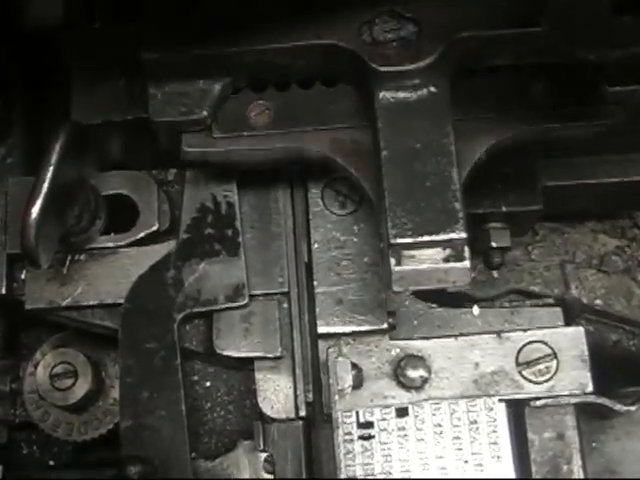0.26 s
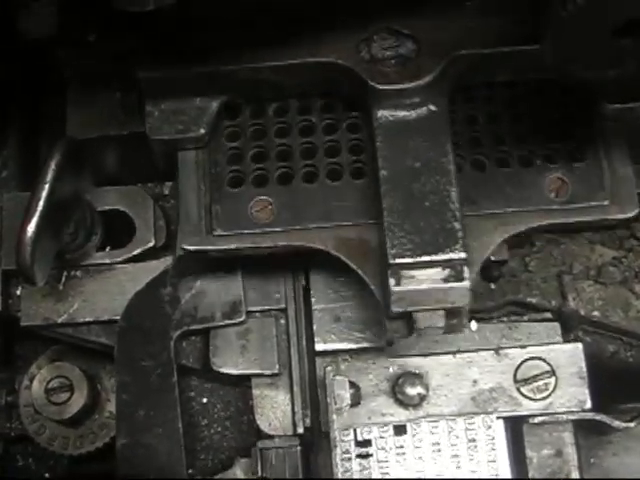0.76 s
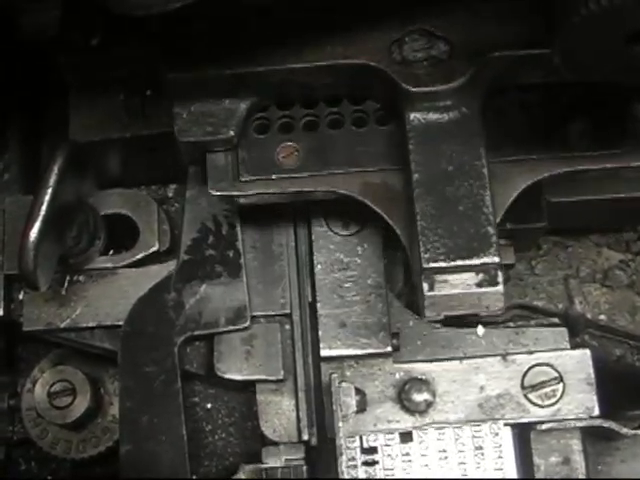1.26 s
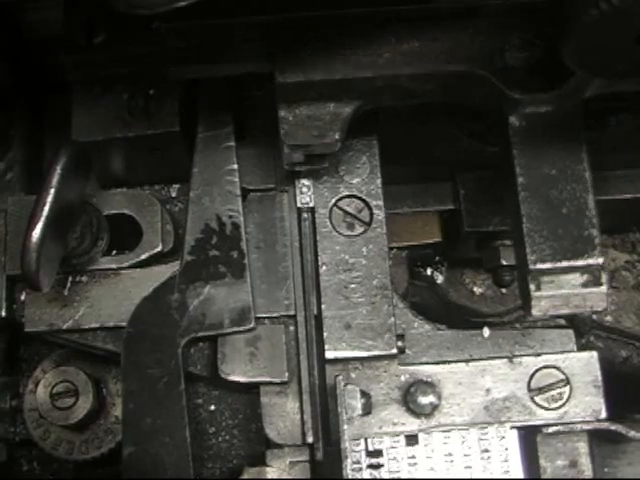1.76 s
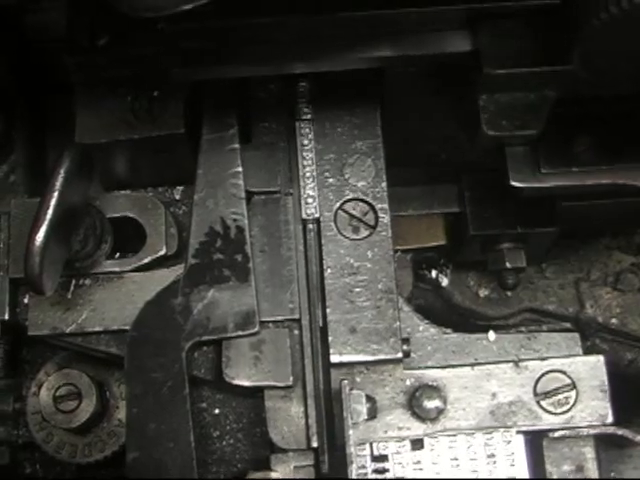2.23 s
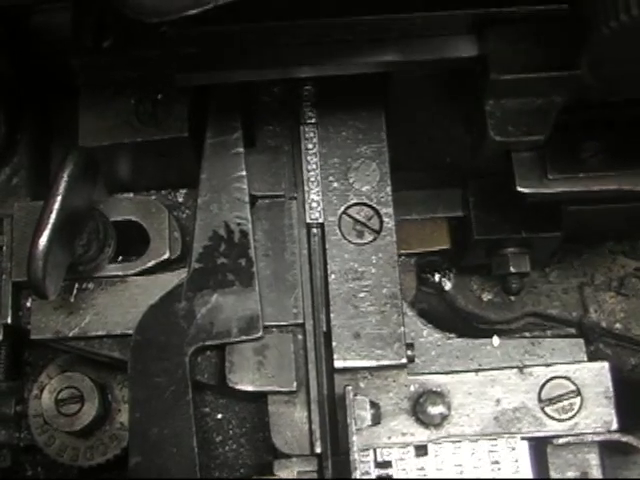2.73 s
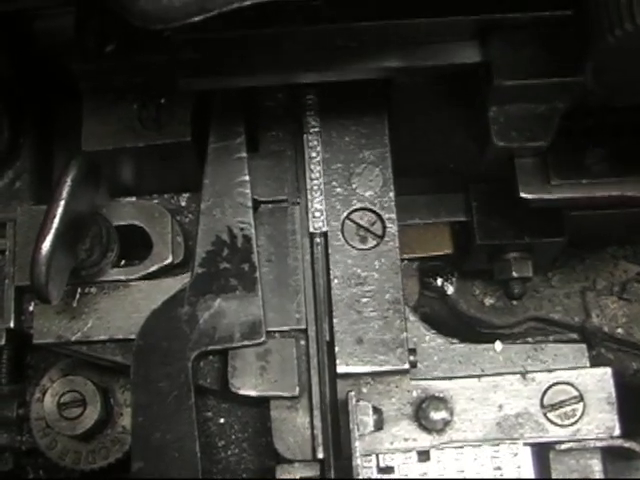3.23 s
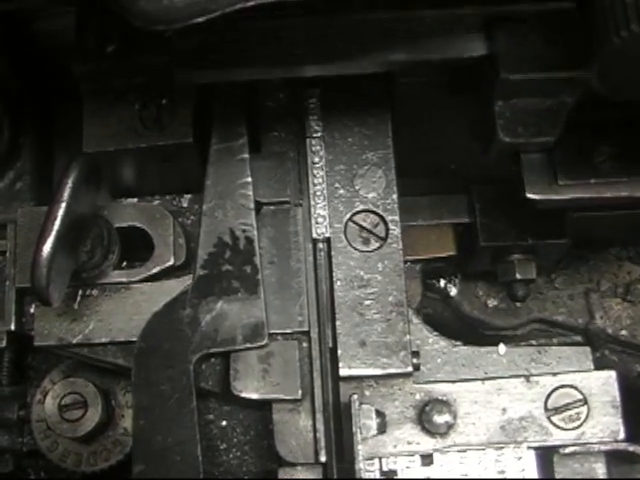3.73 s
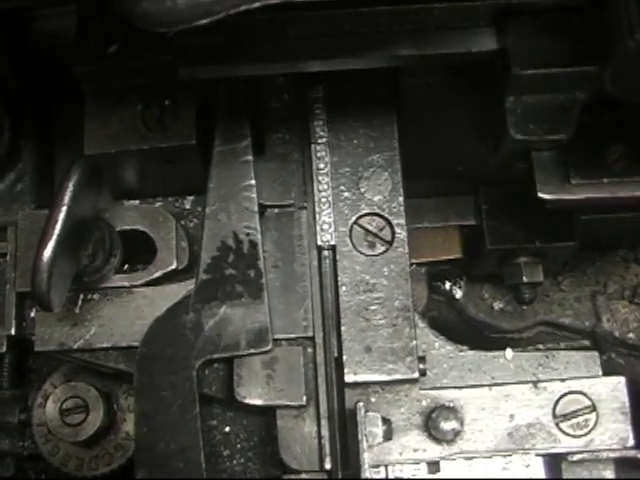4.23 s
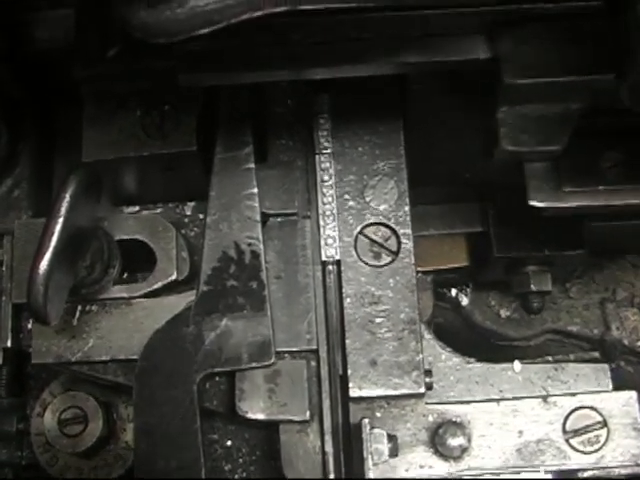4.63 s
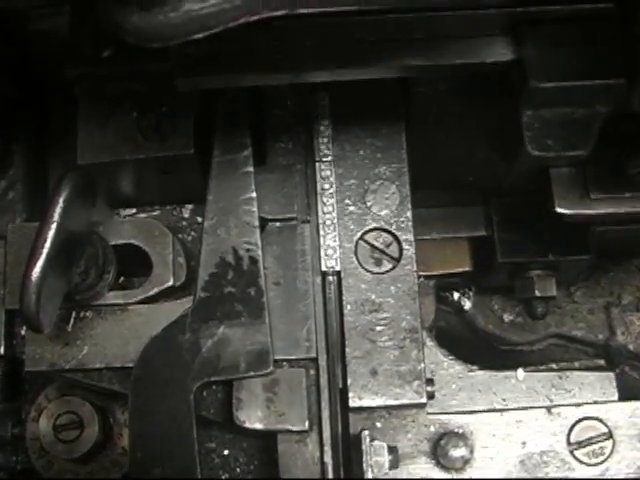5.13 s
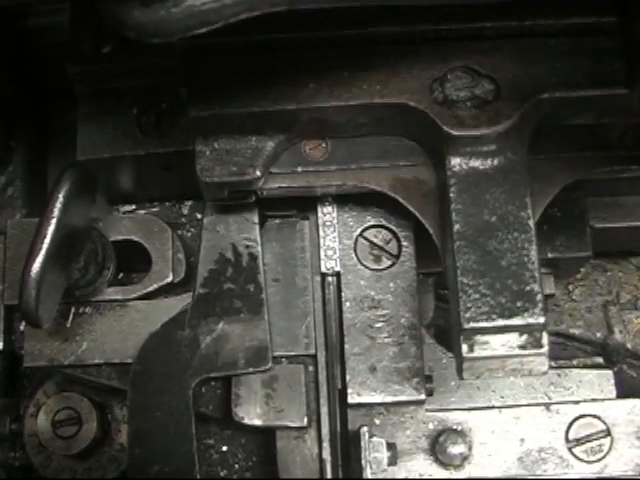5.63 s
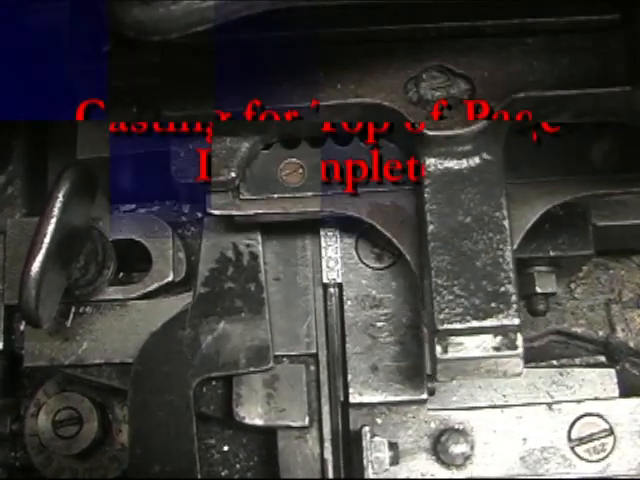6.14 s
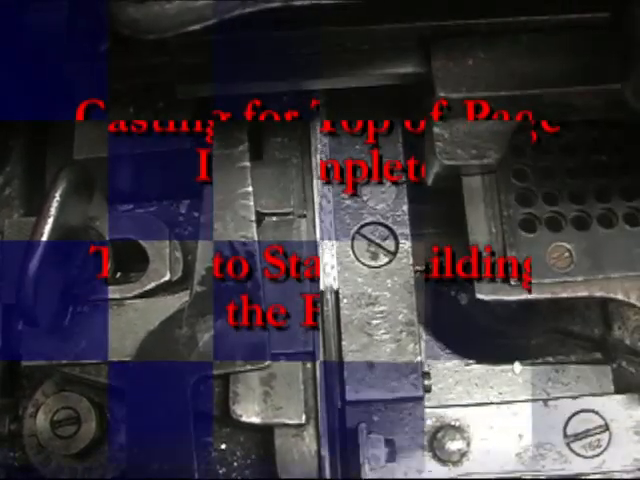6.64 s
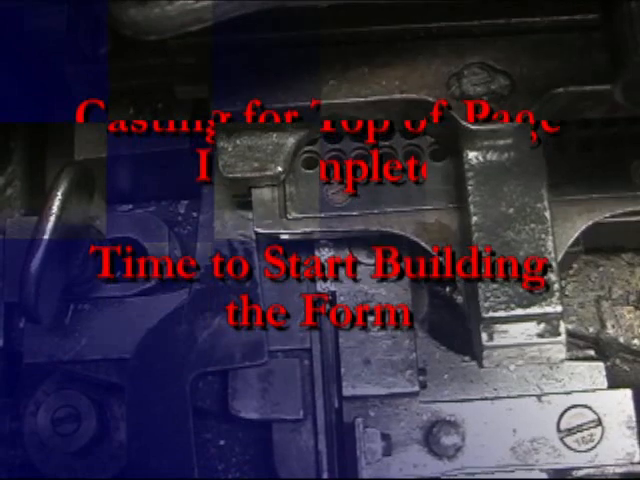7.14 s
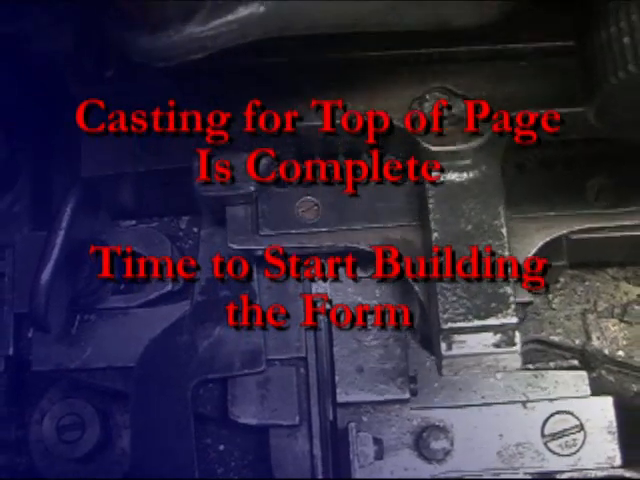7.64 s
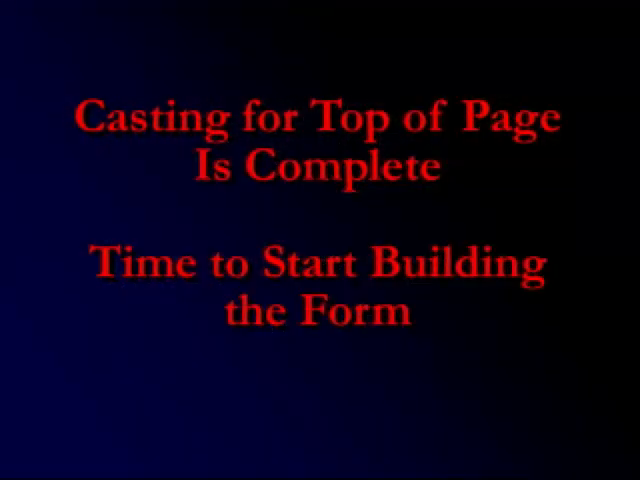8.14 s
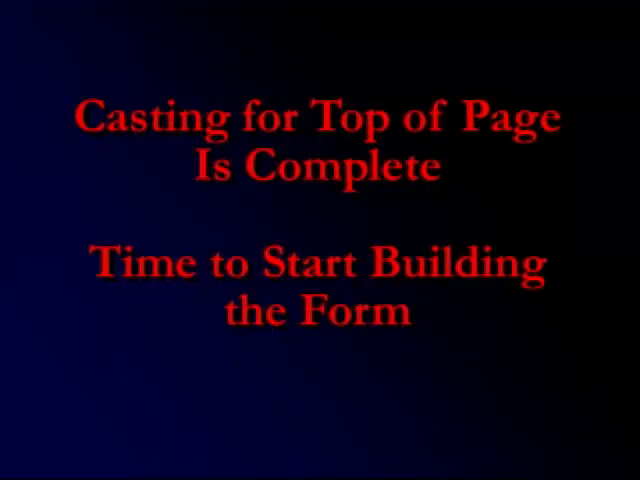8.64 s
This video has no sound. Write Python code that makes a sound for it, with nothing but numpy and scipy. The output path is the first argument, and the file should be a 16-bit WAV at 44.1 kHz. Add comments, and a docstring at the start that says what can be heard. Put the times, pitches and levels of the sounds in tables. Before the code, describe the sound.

A metal type-casting machine clatters rapidly up close over a rushing drive, fades away, then a soft low thump and faint digital crackle follow.

```python
"""A casting machine clatters close by in a workshop, over the steady broadband rush of its drive.
Each blow of steel on steel is a cluster of tiny contacts that set many short modes ringing.
A cam shaft times most blows, and loose parts rattle in step with it; noise makes the echoes and the rush.
The sound fades out. A low thump, made by a step in the signal, and a faint digital crackle of ticks follow."""
import sys
import numpy as np
from scipy import signal
from scipy.fft import rfft, irfft, next_fast_len
from scipy.io import wavfile

SR = 44100
rng = np.random.default_rng(int(sys.argv[2]) if len(sys.argv) > 2 else 0)


def magnitude_from_level(level_db):
    """Linear magnitude for a level in decibels (20 dB per decade)."""
    exponent = np.asarray(level_db, float) / 20
    return 10 ** exponent


def master(y):
    """Save y as 16-bit WAV."""
    cut = np.clip(np.atleast_2d(y).T, -1, 1)
    pcm = np.round(cut * 32767)  # scale
    wavfile.write(sys.argv[1], SR, pcm.astype(np.int16))


N = 392045

# All levels in the tables are relative; contacts() turns treble_db into a gentler tilt.
# turns of the cam shaft, by three contacts: opening_knock_s, jaw_tick_s, closing_slam_s, slam_level_db
TURNS = [(-.11, .169, .3518, -2), (.4382, .713, .9036, -1), (.9876, 1.259, 1.4489, -3.5),
         (1.5311, 1.8135, 1.998, -6), (2.0845, 2.3726, 2.5598, -4.5), (2.6412, 2.9262, 3.1192, -1),
         (3.1978, 3.4802, 3.6703, -3.5), (3.7495, 4.0376, 4.2296, -2.5), (4.3083, 4.5918, 4.7826, -4),
         (4.8615, 5.1403, 5.3263, -3.5), (5.4112, 5.685, 5.8782, -3.5), (5.9577, 6.246, 6.4266, -1),
         (6.5161, 6.795, 6.9853, -5), (7.068, 7.3477, 7.5385, -3.5), (7.618, 7.9, 8.09, -3)]
# steel on steel, once every turn: into_turn_s, level_db, closing_ms, pitch_hz (favoured), treble_db
CAM_CONTACTS = [(0, -13, 1.0, 1200, -3), (.017, -20.5, .5, 6500, 11), (.029, -21, .6, 9000, 14.5),
                (.039, -14, .6, 891, -2.5), (.119, -7.5, 6.0, 7670, 10.5), (.285, -13, 0.36, 4270, 2.5),
                (.294, -5.5, 3.5, 5890, 11), (.309, -4, 2.4, 13400, 11), (.374, -12.5, 1.3, 5600, 8),
                (.4465, -10.5, 1.2, 2630, -15), (.523, -17.5, .6, 2630, 1)]
# contacts made only while the die case rests: into_turn_s, level_db, closing_ms, pitch_hz, treble_db
RESTING_CONTACTS = [(.0505, -11, .3, 4960, 6.4), (.162, -14.5, .6, 4400, 5), (.24, -6, .5, 9000, 3.6),
                    (.337, -9, 1.3, 3600, 5.5), (.456, -4.5, 1.2, 8625, 8)]
# contacts made only while the die case travels: into_turn_s, level_db, closing_ms, pitch_hz, treble_db
TRAVELLING_CONTACTS = [(.0515, -9, .3, 5050, 12), (.237, -5, 5.5, 7000, 4), (.337, -13.5, 1.3, 8170, 14),
                       (.456, -15.5, 2.2, 8870, 4)]
# the closing slam: closing_ms, pitch_hz, treble_db
SLAM = 2.6, 6300, 3.2
# blows outside the pattern, mostly the die case thrown against its stops:
# start_s, level_db, closing_ms, pitch_hz, treble_db
STRAY_BLOWS = [(.064, -11, 0.58, 7140, 4.5), (.1007, -6.5, 0.74, 1910, -17.5),
               (0.1077, -5, 0.42, 12800, 16), (0.1276, -13, 2.77, 1960, -0.5),
               (.1585, -10.5, 1.27, 1070, -5), (.222, -9, .6, 13430, 12), (.292, -15, 1.1, 5000, 4),
               (.3194, -8.5, 1, 2780, 5), (0.4075, -19, 0.95, 2630, 9), (0.4662, -12.5, 1.2, 8870, 12),
               (0.502, -8.5, 6.8, 7100, -7.5), (.6434, -6, 0.29, 11600, 12),
               (.6712, -8.5, 1.28, 1960, -1.5), (.777, -10, 0.56, 7660, 4.5),
               (.8044, -20.5, 0.97, 12570, 12.5), (.8398, -19, 0.84, 5000, -12),
               (0.8707, -11, 1.23, 2453, -15), (.88, -13.5, 0.41, 2800, -4), (0.8949, -5, 0.44, 4400, -3),
               (1.0535, -7, 1.62, 7100, -6.5), (1.142, -13, 1.5, 4400, 10), (1.161, -6.5, 0.7, 11540, 2),
               (1.1837, -3, 1.8, 4560, 0), (1.2122, -7.5, 5, 1960, 4), (1.2528, -16.5, 1, 1057, -9),
               (1.3565, -10.5, 1.4, 9080, 2), (1.3822, -12.5, 5.9, 3780, 0.5),
               (1.4184, -7.5, 1.1, 12400, 13), (1.4673, -9, 1.5, 12900, 4), (1.707, -13, 1.24, 895, -8),
               (1.75, -9.5, 1.3, 7660, -4), (1.8651, -7, 1, 7140, 3.5), (1.922, -7.5, 1.6, 8900, 5),
               (1.936, -5.5, 0.48, 5420, -3.5), (1.966, -13, 0.52, 6600, 0), (2.0125, -5, 2.4, 6630, 5),
               (2.0256, -9.5, 2, 8950, 6), (2.588, -9.5, 1.5, 4470, -9), (3.1206, -13, 0.84, 980, -15),
               (4.931, -8, 3, 13430, -4), (5.073, -5.5, .42, 6460, 12.5), (5.0883, -11, 1.8, 1950, -19),
               (5.1925, -8.5, 2.07, 9130, 11.5), (5.222, -8.5, 0.49, 9000, 13),
               (5.2264, -10, 1.1, 4820, 3.5), (5.3369, -9, 0.69, 2580, 4), (5.351, -19, 0.84, 6000, 3.5),
               (5.438, -10.5, 0.85, 12740, 12.5), (5.4771, -20, 0.35, 1823, -14),
               (5.6003, -15, 0.32, 3570, 3.5), (5.615, -10, .44, 6630, 14.5), (5.6278, -8, 1.6, 1960, 7),
               (5.642, -7, 2.9, 1930, -4.5), (5.8128, -18, 2.8, 6110, 8), (5.865, -9, 3.06, 2550, -7.5),
               (5.89, -12, 4.1, 3870, -1), (6.0272, -19, 2, 4390, -12), (6.131, -13, 0.56, 7570, -2.5),
               (6.1742, -10.5, 0.88, 1920, -5.5), (6.119, -19, 0.28, 4400, -1),
               (6.3898, -9.5, 0.62, 12200, 6), (6.445, -8.5, 2.5, 4380, 2), (6.719, -9, 1.53, 13690, 7),
               (6.7536, -12, 1.4, 1960, 2), (6.877, -10.5, 0.86, 8950, 10), (6.916, -9, 2.4, 7230, 0),
               (6.977, -3, 1.67, 5860, -2), (6.997, -6.5, 2.3, 5000, 3), (7.232, -16.5, 0.82, 4400, 8),
               (7.272, -10, 1.1, 5030, 7), (7.4907, -6.5, 0.78, 7040, 17)]
# colour of the many small steel modes: pitch_hz, level_db (per Hz)
STEEL_COLOUR = [(120, -51), (200, -77.5), (696, -13), (1770, -2.5), (1980, -3), (2960, -1), (4300, 2),
                (5200, -2.5), (7000, -1.5), (13600, -10), (16200, -14.5)]
# longer-ringing parts of the frame: pitch_hz, level_db, ring_s (to fall 60 dB)
FRAME = [(290, -25.5, .1), (959, -22, .045), (1200, -33.5, 0.04), (1960, -14.5, .045), (2630, -15, 0.03),
         (4200, -25.5, .015), (5050, -25.5, .02)]
# loose parts rattling through one turn: into_turn_s, level_db
RATTLE = [(.006, -27.5), (.051, -29), (0.065, -12), (0.082, -21.5), (.101, -41), (0.127, -15.5),
          (.161, -25.5), (0.213, -37.5), (.24, -15), (.2715, -19), (.3065, -15), (.3415, -18.5),
          (.3665, -38), (0.4178, -18.5), (0.435, -23.5), (0.4959, -15), (0.5205, -27), (.5515, -35)]
# colour of the drive's rush: pitch_hz, level_db (per Hz)
DRIVE_COLOUR = [(18, -37.5), (30, -27), (200, -14.5), (287, -2.5), (364, -7), (684, 3.5), (1220, -1.5),
                (4420, -2.5), (8500, -10), (13300, -5), (16200, -11.5)]
# spells of lone ticks in the crackle: start_s, end_s, gap_s (before jitter)
TICK_SPELLS = [(7.806, 7.85, .008), (7.881, 7.985, .033), (8.062, 8.125, .027), (8.191, 8.36, .041),
               (8.438, 8.545, .033), (8.64, 8.745, .019), (8.79, 8.83, .033), (8.84, 8.885, .009)]

TURN_S, TICK_S = 0.5555, 0.285  # one even turn, and the jaw tick within it
SLACK_S = 0.14, 0.235           # the part of the turn where the load speeds or slows the shaft
REST_S = 1.95, 4.95             # the die case rests between these moments
FADE_S = 5.9, 7.73              # start and end of the fade


def shaft():
    """Gives moments, and how far the cam shaft has come by then, in seconds of an even turn."""
    knock, tick = np.transpose(TURNS)[:2, :, None]
    slack_start = knock + SLACK_S[0]
    slack_end = tick - TICK_S + SLACK_S[1]
    moments = np.hstack([knock, slack_start, slack_end, tick])
    turn_starts = TURN_S * np.arange(len(TURNS))[:, None]
    progress = turn_starts + [0, *SLACK_S, TICK_S]
    return moments.ravel(), progress.ravel()


def cam_blows():
    """The turning cam repeats its pattern and its slam; gives rows like STRAY_BLOWS."""
    spread_db = 1.5  # from one turn to the next
    moments, progress = shaft()
    rows = [(slam_s, level_db, *SLAM) for _, _, slam_s, level_db in TURNS]
    tables = (CAM_CONTACTS, None), (RESTING_CONTACTS, True), (TRAVELLING_CONTACTS, False)
    for turn in range(len(TURNS)):
        for table, resting in tables:
            for into_turn_s, level_db, *kind in table:
                start_s = np.interp(turn * TURN_S + into_turn_s, progress, moments)
                at_rest = REST_S[0] < start_s < REST_S[1]
                if start_s > 0 and resting in (None, at_rest):
                    rows.append((start_s, level_db + spread_db * rng.standard_normal(), *kind))
    return np.array(rows)


def at_hz(points, hz):
    """Reads a spectrum on a log-frequency axis."""
    point_hz, point_db = np.array(points)[:, 0], np.array(points)[:, 1]
    return np.interp(np.log(hz), np.log(point_hz), point_db)


def steel_modes(t60_s, count):
    """Steel rings in many short modes, shorter at high pitch; the frame adds longer ones at the end."""
    spacing = np.linspace(0, 1, count) ** 1.5
    hz = 250 + 15900 * spacing * rng.uniform(.995, 1.005, count)
    # where modes lie far apart, each one carries more of the spectrum
    level_db = at_hz(STEEL_COLOUR, hz) + 10 * np.log10(np.gradient(hz).clip(5))
    level_db = level_db - level_db.max()
    t60 = t60_s * (hz / 4000) ** -.25
    frame_hz, frame_db, frame_t60 = np.transpose(FRAME)
    return np.append(hz, frame_hz), np.append(level_db, frame_db), np.append(t60, frame_t60)


def contacts(modes, blows, ring_db, ring_octaves, frame_db, bounce_ms, level_db, count):
    """Each blow is a cluster of small contacts: they swell while the parts close, then bounce away.
    Gives the sample of each contact, its force, and each mode's share of the blow."""
    hz, mode_db, _ = modes
    start_s, blow_db, closing_ms, pitch_hz, treble_db = np.transpose(blows)[:, :, None]
    draw = rng.random((len(blows), count))
    closing = np.arange(count) < count // 2
    bounce_late_ms = closing_ms - bounce_ms * np.log(1 - draw)
    late_ms = np.where(closing, closing_ms * draw, bounce_late_ms)
    force = np.where(closing, 0.16 + draw, (1 - draw) ** 0.54)
    force = force / np.sqrt(np.sum(force ** 2, axis=1, keepdims=True))
    at = np.clip(((start_s + late_ms / 1000) * SR).astype(int), 0, N - 1)
    # where the blow lands decides which modes answer: a tilt, one favoured region, and chance
    share_db = mode_db + 0.35 * (treble_db + 2.0) * np.log2(hz / 4500).clip(-.8, 1.5)
    favour_db = ring_db - 0.085 * treble_db  # dull blows land on heavy parts that clank
    octaves_away = np.log2(hz / pitch_hz)
    share_db = share_db + favour_db * np.exp(-.5 * (octaves_away / ring_octaves) ** 2)
    # a blow on a frame part sets the level of that part's ring
    is_frame = np.arange(len(hz)) >= len(hz) - len(FRAME)
    struck = is_frame & (abs(octaves_away) < .1)
    share_db = share_db + frame_db * struck
    share = magnitude_from_level(share_db + rng.normal(0, 3.48, share_db.shape) * ~struck)
    share = share / np.sqrt(np.sum(share ** 2, axis=1, keepdims=True))
    return at, force, share * magnitude_from_level(blow_db + level_db)


def ring(clicks, hz, t60):
    """A unit click sets a sine of height 1 ringing; it falls 60 dB in t60 seconds."""
    decay, turn = magnitude_from_level(-60 / (t60 * SR)), 2 * np.pi * hz / SR
    feedback = [1, -2 * decay * np.cos(turn), decay * decay]
    return signal.lfilter([0, np.sin(turn)], feedback, clicks + 1e-18)


def clatter(modes, *groups):
    """All contacts ring the small modes; the heavy frame answers only the first push of a blow."""
    out = np.zeros(N)
    small_count = len(modes[0]) - len(FRAME)
    for k, (hz, t60) in enumerate(zip(modes[0], modes[2])):
        clicks = np.zeros(N)
        for at, force, share in groups:
            if k < small_count:
                sign = rng.choice([-1, 1], at.shape)
                push = force * sign * share[:, k:k + 1]
                clicks += np.bincount(at.ravel(), push.ravel(), N)
            else:
                clicks += np.bincount(at.min(axis=1), share[:, k], N)
        out += ring(clicks, hz, t60)
    return out


def loose_parts(spread_db, count):
    """Weak touches at random moments, as strong as the cam's position makes them; rows like STRAY_BLOWS."""
    draw = rng.random((count, 4))
    start_s = FADE_S[1] * (np.arange(count) + draw[:, 0]) / count
    progress = np.interp(start_s, *shaft())
    level_db = np.interp(progress, *np.transpose(RATTLE), period=TURN_S)
    level_db = level_db + spread_db * (draw[:, 1] ** 2 - .5)
    closing_ms = np.ones(count)
    pitch_hz = 900 * 2 ** (3.44 * draw[:, 2])
    treble_db = 19.8 * draw[:, 3] - 3.0
    return np.transpose([start_s, level_db, closing_ms, pitch_hz, treble_db])


def workshop(x, t60_s, early_t60_s, early_db, count):
    """Dense echoes: quick ones from the castings nearby, a slower tail from the walls.
    Blows come from different spots of the machine, so every 15 ms is dealt to one of several paths."""
    t = np.arange(SR // 3) / SR
    walls = magnitude_from_level(-60 * t / t60_s)
    castings = magnitude_from_level(early_db - 60 * t / early_t60_s)
    shape = (walls + castings) * (1 - np.exp(-t / 0.0057))
    spot = np.repeat(rng.integers(0, count, N // 660 + 1), 660)[:N]
    # each path is slightly dulled noise
    paths = signal.lfilter([.75], [1, -.25], rng.standard_normal((count, len(t))) * shape)
    echoes = np.zeros(N)
    for k, path in enumerate(paths):
        path = path / np.sqrt(np.sum(path ** 2))
        echoes += signal.oaconvolve(x * (spot == k), path)[:N]
    return echoes


def coloured(x, points):
    """Shapes a signal by a spectrum."""
    size = next_fast_len(len(x))
    hz = np.maximum(np.arange(size // 2 + 1) * SR / size, 1)
    return irfft(rfft(x, size) * magnitude_from_level(at_hz(points, hz)), size)[:len(x)]


def drive():
    """Motor, belts and gears: a steady broadband rush with little bass."""
    rms_db = -33.5
    noise = coloured(rng.standard_normal(N), DRIVE_COLOUR)
    return magnitude_from_level(rms_db) * noise / np.std(noise)


def crackle(tick_db, shrink_db_per_s, thump_db, dense_per_s):
    """A step in the signal's offset thumps; ticks flicker densely on it, then thin out and shrink."""
    thump_s = 7.728
    t = np.arange(N) / SR - thump_s
    tick_s = []
    for start_s, end_s, gap_s in TICK_SPELLS:
        even_s = np.arange(start_s, end_s, gap_s)
        tick_s.append(even_s + gap_s * rng.normal(0, .1, len(even_s)))
    tick_s = np.hstack(tick_s)
    # some come in pairs
    tick_s = np.append(tick_s, tick_s[rng.random(len(tick_s)) < .3] + .002)
    sign = np.where(rng.random(len(tick_s)) < .2, 1, -1)
    ticks = np.bincount((tick_s * SR).astype(int), sign, N)[:N]
    chance = dense_per_s / SR * np.exp(-t.clip(0) / .035)
    dense = (rng.random(N) < chance) & (t > .001) & (t < .068)
    ticks = ticks + dense * np.where(t < .011, 1, -1)
    # the offset drops at once, then climbs to the other side
    offset = -1. * (t > 0) + 2.0 * np.clip((t - .001) / 0.011, 0, 1)
    raw = magnitude_from_level(tick_db - shrink_db_per_s * t) * ticks + magnitude_from_level(thump_db) * offset
    raw = signal.sosfilt(signal.butter(2, 18, "high", fs=SR, output="sos"), raw)
    return signal.sosfiltfilt(signal.cheby2(5, 35, 8000, fs=SR, output="sos"), raw)


def scene():
    """Adds up blows, rattle, their echoes and the drive."""
    modes = steel_modes(t60_s=0.019, count=150)
    blows = contacts(modes, np.vstack([cam_blows(), STRAY_BLOWS]), ring_db=6.0, ring_octaves=0.093,
                     frame_db=19.5, bounce_ms=3.0, level_db=5.0, count=18)
    touches = contacts(modes, loose_parts(spread_db=11.0, count=2000), ring_db=14.5, ring_octaves=0.23,
                       frame_db=-12.5, bounce_ms=1.5, level_db=3.5, count=4)
    steel = clatter(modes, blows, touches)
    # small parts radiate no bass
    steel = signal.sosfilt(signal.butter(4, 320, "high", fs=SR, output="sos"), steel)
    echoes = workshop(steel, t60_s=0.14, early_t60_s=0.08, early_db=15.0, count=6)
    return (steel + magnitude_from_level(-9.5) * echoes + drive())[None]


def low_pass(x):
    """Removes everything above the highest recorded frequency."""
    return signal.sosfilt(signal.butter(12, 16440, fs=SR, output="sos"), x)


def record(dry):
    """The loudest peaks overload, the top is cut, the sound fades in a straight line, the crackle follows."""
    clip, cutoff_hz = 0.8, 16200
    fade = np.interp(np.arange(N) / SR, FADE_S, [1, 0])
    top_cut = signal.cheby2(20, 45, cutoff_hz, fs=SR, output="sos")
    out = signal.sosfilt(top_cut, np.clip(dry, -clip, clip)) * fade
    out = out + crackle(tick_db=-21.5, shrink_db_per_s=5.5, thump_db=-34.0, dense_per_s=3000)
    return low_pass(out)


dry = scene()
out = record(dry)
master(out)
```